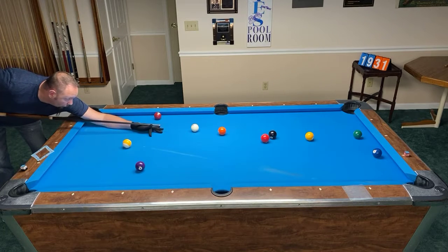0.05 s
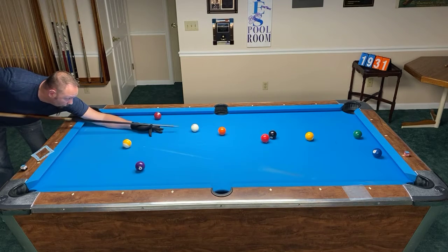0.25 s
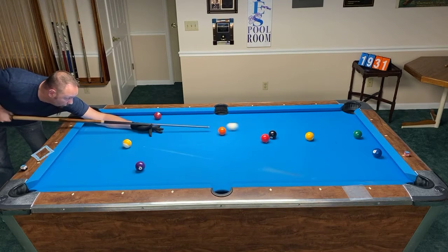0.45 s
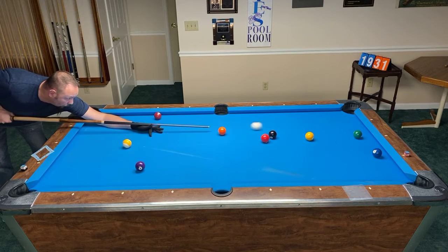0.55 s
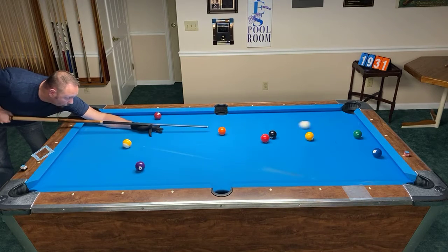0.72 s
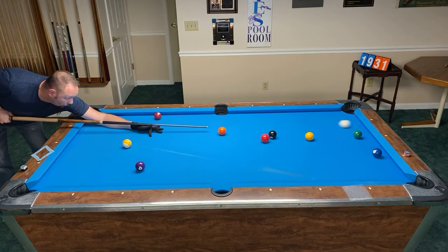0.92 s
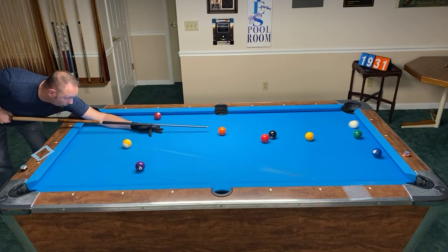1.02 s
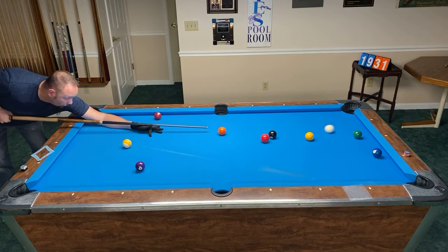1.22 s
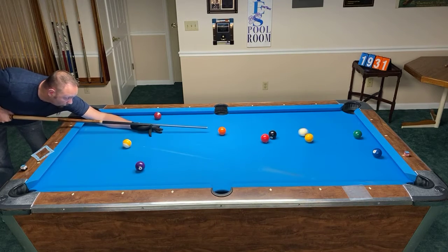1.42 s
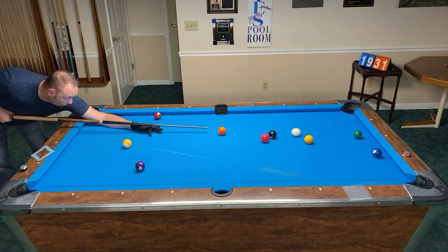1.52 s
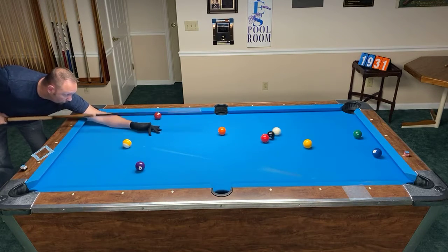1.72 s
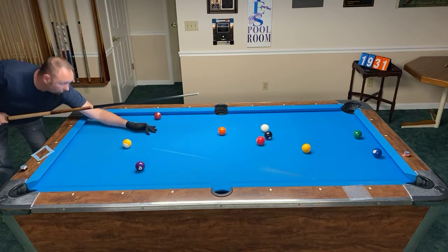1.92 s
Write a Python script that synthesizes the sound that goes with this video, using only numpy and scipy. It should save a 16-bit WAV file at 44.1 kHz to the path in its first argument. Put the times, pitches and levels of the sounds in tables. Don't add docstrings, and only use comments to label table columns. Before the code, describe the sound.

Billiard cue knock, low rolling, dull rail bump, then a sharp ball click and a softer one

```python
import sys
import numpy as np
from scipy import signal
from scipy.fft import rfft, irfft
from scipy.io import wavfile

SR = 44100
rng = np.random.default_rng(int(sys.argv[2]) if len(sys.argv) > 2 else 0)


def unload_audio(sound):
    columns = np.transpose(np.atleast_2d(sound))
    steps = np.round(np.clip(columns, -1, 1) * 32767)
    wavfile.write(sys.argv[1], SR, steps.astype(np.int16))


def gain_from_decibels(decibels):
    exponent = np.asarray(decibels, float) / 20
    return 10 ** exponent


N = 85995
PULSE_CENTRE_S = .005


def ball_clicks():
    # contact in seconds, peak in dB, room tail in dB, hold of the tail in seconds.
    clicks = [
        (1.3044, -19, -9, 0.0067),
        (1.6004, -26.5, -5.5, 0.064),
    ]
    # arrival in seconds, peak in dB.
    wall_echoes = [(1.3206, -21), (1.3252, -28), (1.3335, -30), (1.3645, -32), (1.6165, -30), (1.621, -33),
                   (1.6335, -36), (1.6505, -27), (1.6662, -27), (1.6828, -29), (1.6965, -34), (1.733, -37)]
    direct_low_hz, wall_dull_hz = 1180, 7100

    echoes = sum(impulse(s - PULSE_CENTRE_S, db) for s, db in wall_echoes)
    sharp = cut(echoes, wall_dull_hz, "low")
    tails = 0
    for s, db, tail_db, hold_s in clicks:
        contact = impulse(s - PULSE_CENTRE_S, db)
        sharp = sharp + contact
        tails = tails + room(contact, tail_db, hold_s)
    thinned = cut_both_ways(sharp, direct_low_hz, "high", order=1)
    return signal.fftconvolve(thinned + tails, ball_pulse())[:N]


def ball_pulse():
    contact_s = .000395
    low_hz, high_hz, lobes_db = 940, 3340, -25.5
    ring_hz, ring_db, ring_t60_s = 13300, -28, .0035

    t = np.arange(1000) / SR - PULSE_CENTRE_S
    force = np.cos(np.pi * np.clip(t / contact_s, -.5, .5))
    slope = cut_both_ways(np.gradient(force), low_hz, "high", order=1)
    pulse = cut_both_ways(slope, high_hz, "low", order=4) + gain_from_decibels(lobes_db) * slope
    ring_start = np.arange(1000) == 205
    shell = ring(gain_from_decibels(ring_db) * ring_start, ring_hz, ring_t60_s)
    return -pulse / abs(pulse).max() + shell


def cue():
    # frequency in Hz, level in dB.
    shaft_modes = [(280, -23), (360, 2.5), (506, 2.5), (600, -1), (764, -2), (894, -4), (1000, 2.5),
                   (1265, -15.5), (1491, -8.5), (1795, -10.5), (2234, -12.5), (2580, -14.5), (3286, -7),
                   (3770, -20)]
    # frequency in Hz, level in dB, T60 in seconds.
    held_modes = [(512.5, 2.5, 0.42), (581, 3.5, 0.23), (973, -9, 0.2), (1491, -9, 0.51), (1810, -5, 0.38),
                  (2900, 0.5, 0.083), (3240, 7.5, 0.094)]
    strike_s, ring_t60_s, rise_s = .2256, .07, 0.014
    shaft_db, held_db, near_db = -40, -33, -4
    knock_db, knock_hz = -2, (260, 1390)
    crack_db, crack_hz = -17, (2300, 4600)
    tick_db, top_hz = -46.5, 4350

    shaft = sum(ring(impulse(strike_s, shaft_db + db), hz, ring_t60_s) for hz, db in shaft_modes)
    knock = cut(impulse(strike_s, knock_db), knock_hz, "band")
    crack = cut(impulse(strike_s + 0.001084, crack_db), crack_hz, "band")
    body = cut(shaft + knock - crack, top_hz, "low", order=8)

    held = sum(ring(impulse(strike_s, held_db + db), hz, t60) for hz, db, t60 in held_modes)
    since_strike = np.maximum(np.arange(N) / SR - strike_s, 0)
    swell = 1 - np.exp(-since_strike / rise_s)

    touches = impulse(strike_s - .0003, tick_db) + impulse(strike_s + 0.001, tick_db + 4.5)
    tick = cut(touches, 3000, "high")

    near = gain_from_decibels(near_db) * cut(body, 1700, "high", order=1) * np.minimum(swell * 6, 1)
    body_room = room(body, -7.5, 0.029) + room(body, -5.5, 0.022)
    tick_room = room(cut(tick, 5300, "low", order=1), 6, 0.022)
    return near + swell * held + tick + body_room + tick_room


def cushion():
    # frequency in Hz, level in dB.
    rail_modes = [(133, -0.5), (221, 3.5), (295, 3.5), (328, 2.5), (425, -1), (500, 6), (592, -0.5),
                  (700, -3), (830, -3), (1100, -15.5)]
    hit_s, hit_db, soft_hz, ring_t60_s = .894, -23.5, 604, .09

    push = cut(impulse(hit_s, hit_db), soft_hz, "low")
    rail = sum(gain_from_decibels(db) * ring(push, hz, ring_t60_s) for hz, db in rail_modes)
    body = gain_from_decibels(-23) * rail + gain_from_decibels(-38) * push
    return gain_from_decibels(-10) * body + room(body, -3.5, 0.01)


def rolling():
    # time in seconds, slate in dB, cloth in dB against the slate.
    roll_levels = [(0.0, -71.5, 10), (0.048, -61, -1), (0.216, -57, -11), (0.248, -56, -13),
                   (0.33, -54.5, 6.5), (0.396, -59.5, 10), (0.428, -54, 9.5), (0.516, -61, 2),
                   (0.836, -46.5, -5.5), (0.884, -57, -1), (0.96, -45.5, 9.5), (1.02, -54.5, 5),
                   (1.216, -54.5, -18), (1.308, -60.5, 3.5), (1.394, -50, -12), (1.612, -58.5, -26),
                   (1.644, -51, -1), (1.95, -66.5, -29)]
    # frequency in Hz, width in Hz, level in dB.
    cloth_modes = [(118.6, 74, -5), (237, 18, -11.5), (305, 112, -10), (512, 150, -20.5)]
    slate_hz, wander_hz, rough_width_hz, rough_db = 66, 4.9, 46, -5

    slate_db, cloth_db = in_time(roll_levels)
    cloth = sum(gain_from_decibels(db) * hum(hz, width_hz) for hz, width_hz, db in cloth_modes)
    drift = np.interp(np.arange(N) / SR, np.arange(30) / 12, rng.standard_normal(30))
    pitch_hz = slate_hz + wander_hz * rms_one(drift)
    tone = np.sqrt(2) * np.sin(2 * np.pi * np.cumsum(pitch_hz) / SR)
    rough = gain_from_decibels(rough_db) * hum(slate_hz, rough_width_hz)
    return gain_from_decibels(slate_db) * (tone + rough + gain_from_decibels(cloth_db) * cloth)


def ticks():
    # time in seconds, level in dB, pitch in Hz.
    faint_ticks = [
        (.001, -56.5, 1990),
        (.757, -58, 2210),
        (.768, -53, 940),
        (.79, -58.5, 2240),
        (.893, -58.5, 1880),
    ]
    direct = sum(gain_from_decibels(db) * wavelet(s, hz, 0.00042) for s, db, hz in faint_ticks)
    return direct + room(direct, -13, 0.014)


def air():
    # frequency in Hz, level in dB per Hz.
    floor_spectrum = [(18, -23), (30, -10), (90, -8.5), (336, -23), (961, -28), (1100, -32.5), (7460, -40),
                      (14800, -50.5), (16000, -75)]
    # time in seconds, level in dB.
    floor_gain = [(0, -2), (.5, -1.5), (1.2, -2.5), (1.55, -1), (1.7, 1.5), (1.95, 2)]
    floor_db = -61

    hz = np.arange(N // 2 + 1) * SR / N
    spectrum = rfft(rng.standard_normal(N)) * gain_from_decibels(at_hz(floor_spectrum, hz))
    return gain_from_decibels(floor_db + in_time(floor_gain)[0]) * rms_one(irfft(spectrum, N))


def room(x, db, hold_s):
    # frequency in Hz, T60 in seconds.
    room_decay = [(150, 0.61), (500, 0.43), (1500, 0.47), (4000, 0.34), (10000, 0.1)]
    echoes_per_s, far_wall_s, early_db = 2500, .0157, -9

    t = np.arange(SR) / SR
    crowding = 1 + 30 * t
    hits = rng.random(SR) < echoes_per_s * crowding / SR
    echoes = rng.standard_normal(SR) * hits / np.sqrt(crowding)
    echoes = echoes * gain_from_decibels(early_db * (t < far_wall_s)) * (t > .001) / np.sqrt(echoes_per_s / 1000)

    octave = np.log2(np.arange(SR // 2 + 1) + 1.)
    spectrum, tail = rfft(echoes), 0
    for k in range(5, 16):
        band = irfft(spectrum * np.clip(1 - abs(octave - k), 0, 1), SR)
        dying_s = np.maximum(t - hold_s * (k < 14), 0)
        tail = tail + band * gain_from_decibels(-60 * dying_s / at_hz(room_decay, 2. ** k))
    fade_in = np.minimum(t / 0.00069, 1)
    return gain_from_decibels(db) * signal.fftconvolve(x, tail * fade_in)[:N]


def impulse(s, db):
    out = np.full(N, 1e-18)
    out[int(np.clip(s * SR, 0, N - 1))] = gain_from_decibels(db)
    return out


def ring(x, hz, t60):
    r, w = gain_from_decibels(-60 / (t60 * SR)), 2 * np.pi * hz / SR
    return signal.lfilter([0, np.sin(w)], [1, -2 * r * np.cos(w), r * r], x)


def wavelet(s, hz, width_s):
    t = np.arange(N) / SR - s
    return -np.cos(2 * np.pi * hz * t) * np.exp(-.5 * (t / width_s) ** 2)


def hum(hz, width_hz):
    r, x = np.exp(-np.pi * width_hz / SR), rng.standard_normal(N + SR)
    for _ in range(2):
        x = signal.lfilter([1, 0, -1], [1, -2 * r * np.cos(2 * np.pi * hz / SR), r * r], x)
    return rms_one(x[SR:])


def cut(x, hz, kind, order=2):
    return signal.sosfilt(signal.butter(order, hz, kind, fs=SR, output="sos"), x)


def cut_both_ways(x, hz, kind, order):
    return signal.sosfiltfilt(signal.butter(order, hz, kind, fs=SR, output="sos"), x)


def rms_one(x):
    return x / np.sqrt(np.mean(x ** 2) + 1e-20)


def in_time(rows):
    s, *columns = np.transpose(rows)
    return [np.interp(np.arange(N) / SR, s, c) for c in columns]


def at_hz(points, hz):
    table_hz, values = np.transpose(points)
    return np.interp(np.log(hz + 1), np.log(table_hz), values)


def scene():
    return (ball_clicks() + cue() + cushion() + ticks() + rolling() + air())[None]


def roll_off(x):
    return signal.sosfilt(signal.butter(12, 16130, fs=SR, output="sos"), x)


def record(dry):
    mix = cut(dry, 54.6, "high", order=6)
    return roll_off(mix)


dry = scene()
out = record(dry)
unload_audio(out)
```